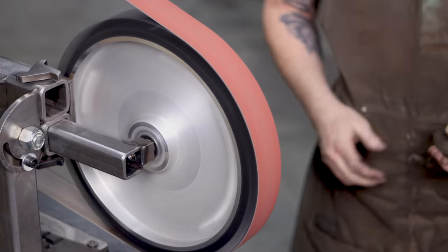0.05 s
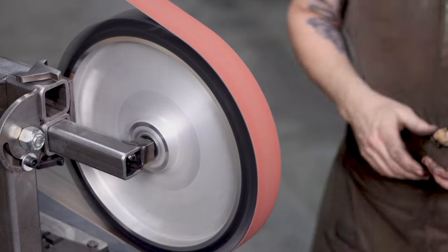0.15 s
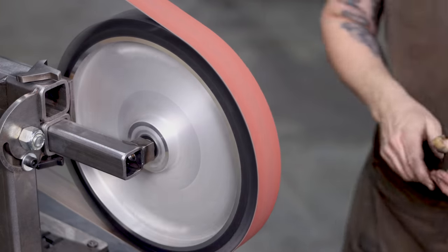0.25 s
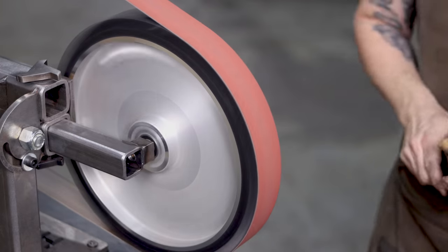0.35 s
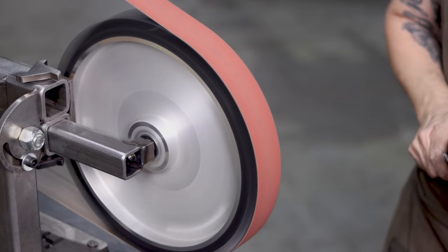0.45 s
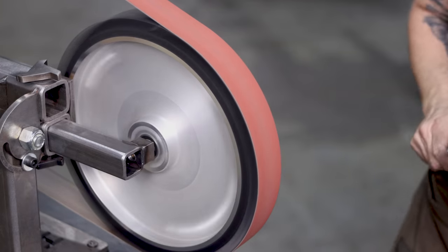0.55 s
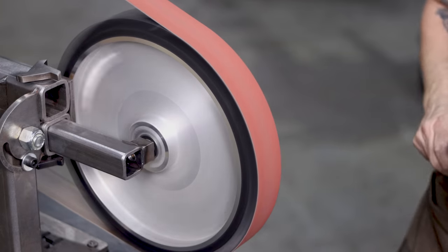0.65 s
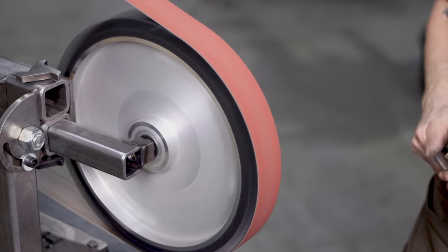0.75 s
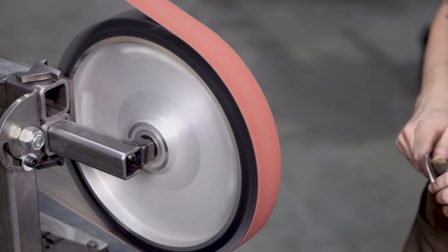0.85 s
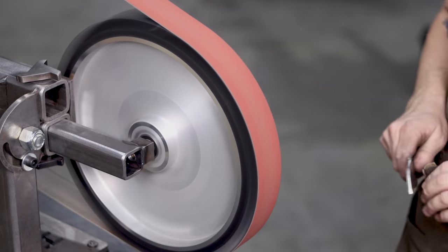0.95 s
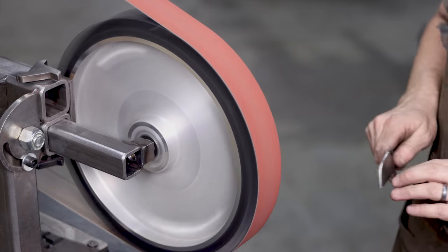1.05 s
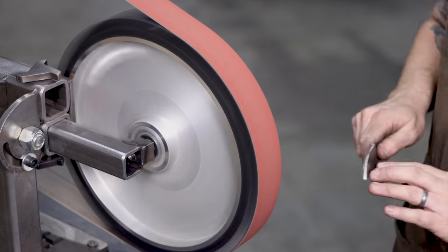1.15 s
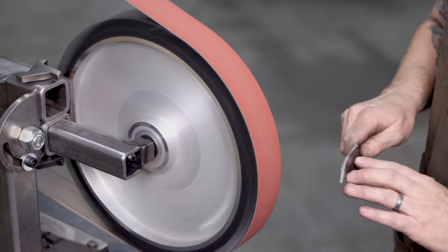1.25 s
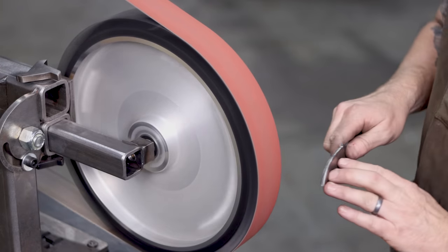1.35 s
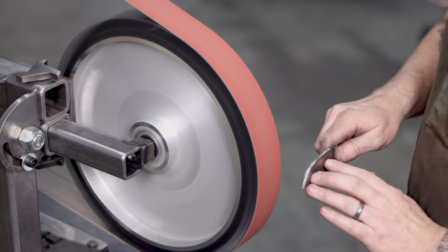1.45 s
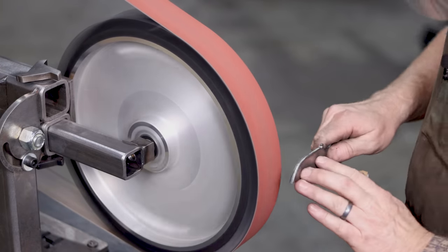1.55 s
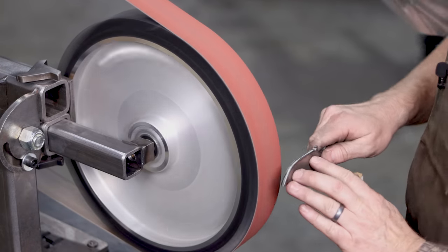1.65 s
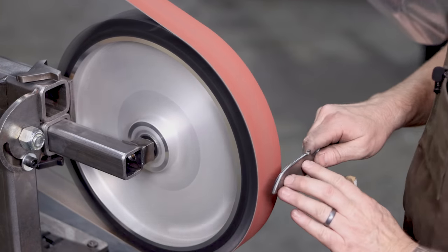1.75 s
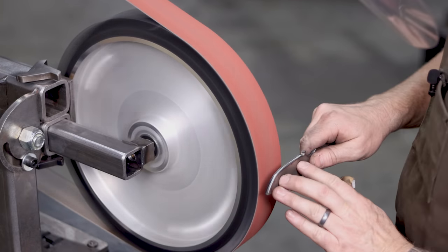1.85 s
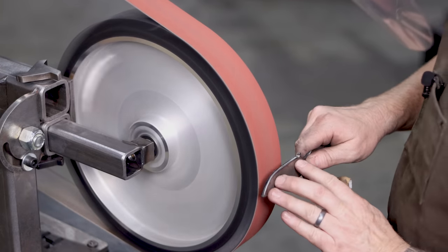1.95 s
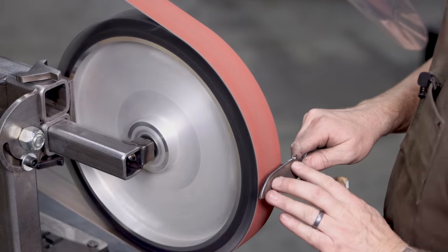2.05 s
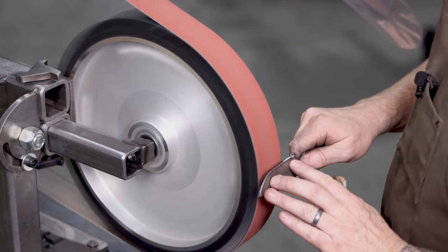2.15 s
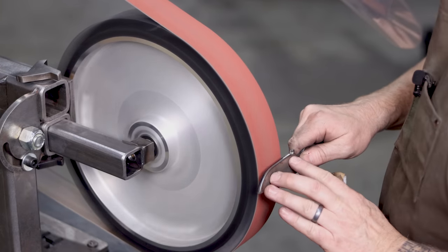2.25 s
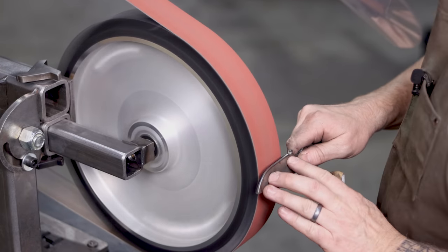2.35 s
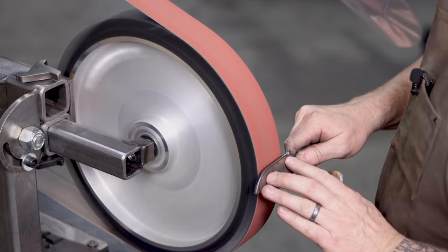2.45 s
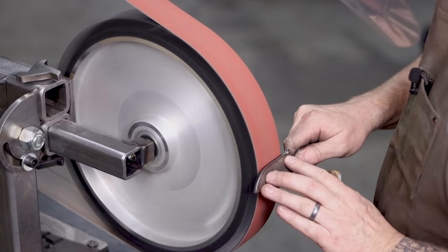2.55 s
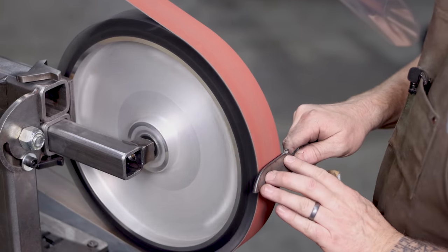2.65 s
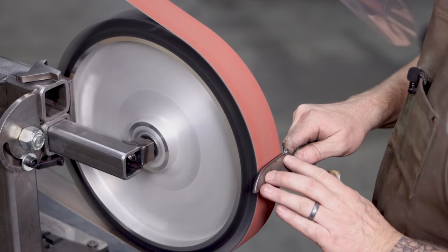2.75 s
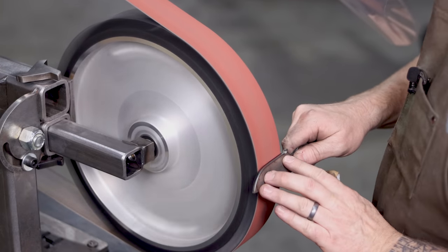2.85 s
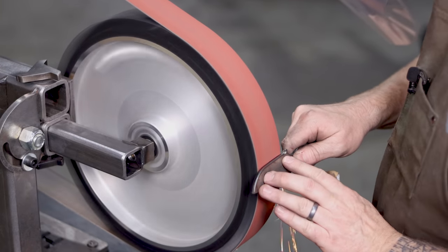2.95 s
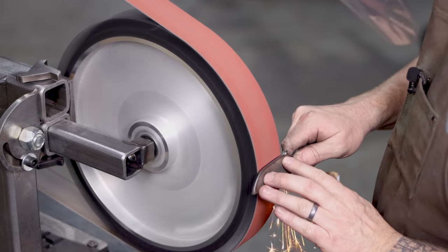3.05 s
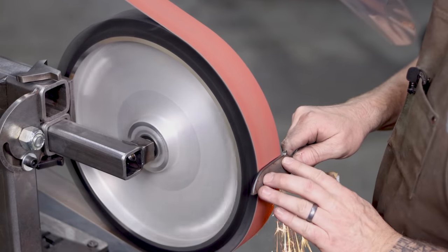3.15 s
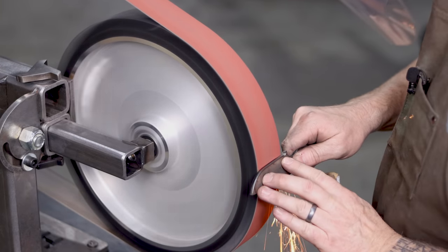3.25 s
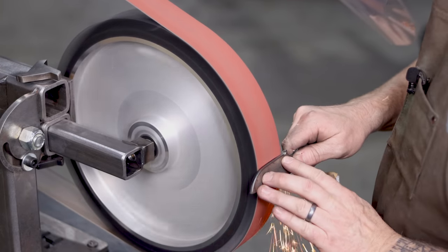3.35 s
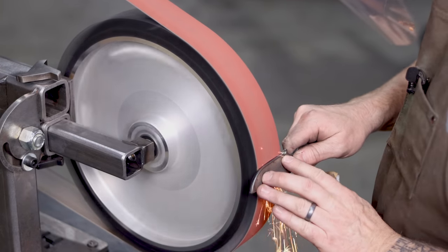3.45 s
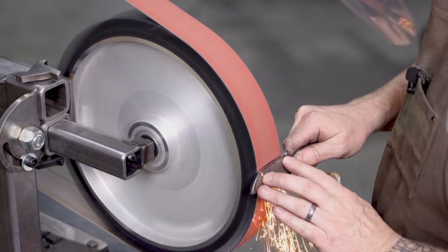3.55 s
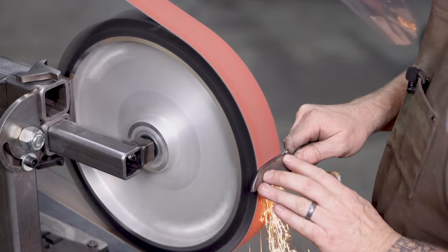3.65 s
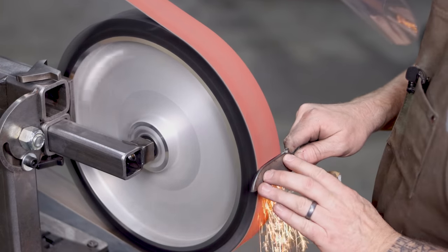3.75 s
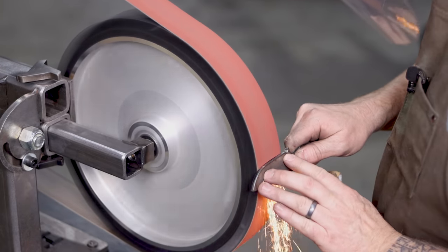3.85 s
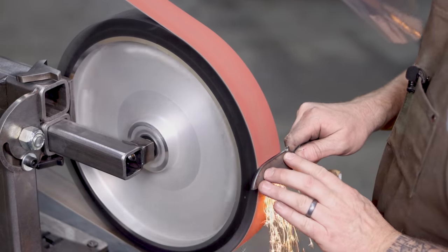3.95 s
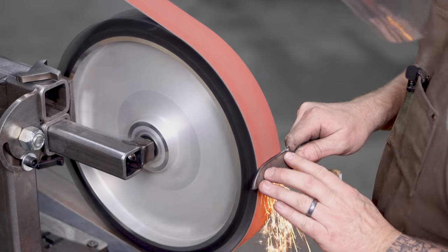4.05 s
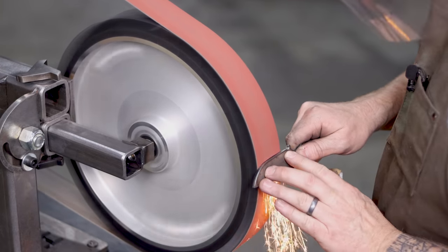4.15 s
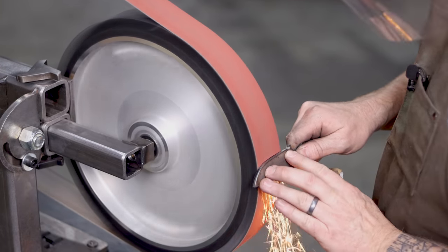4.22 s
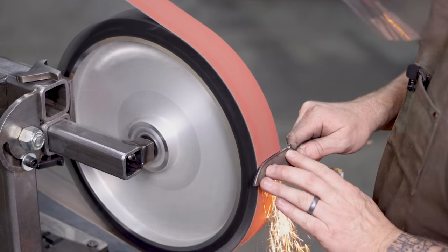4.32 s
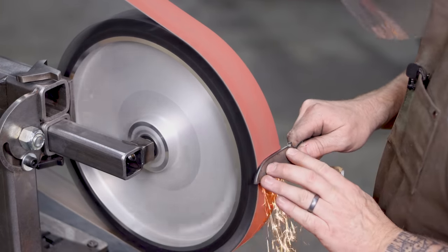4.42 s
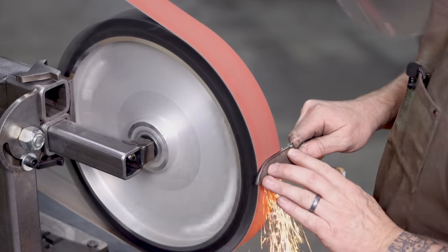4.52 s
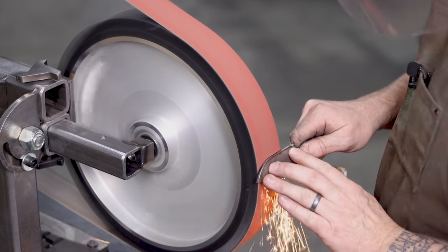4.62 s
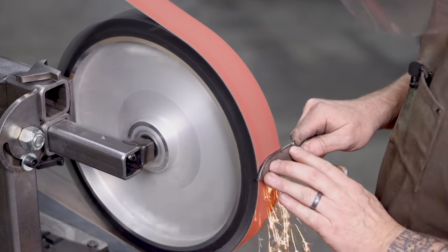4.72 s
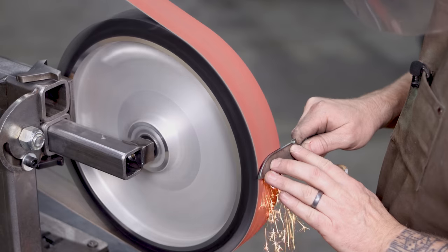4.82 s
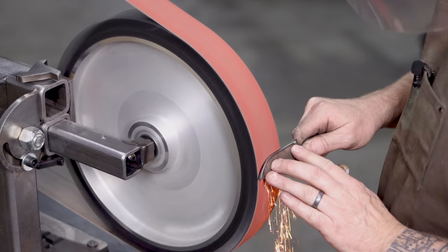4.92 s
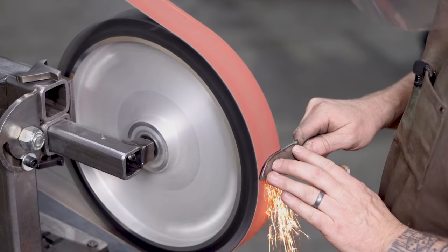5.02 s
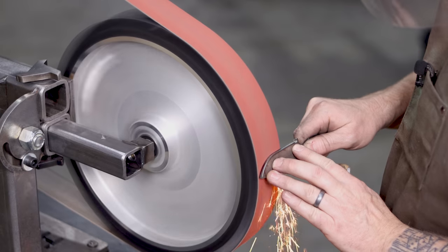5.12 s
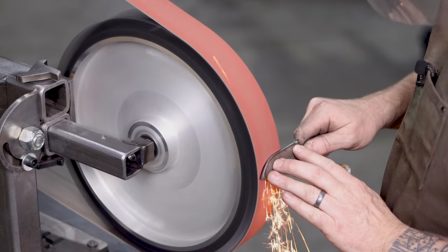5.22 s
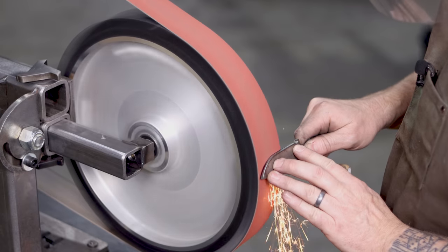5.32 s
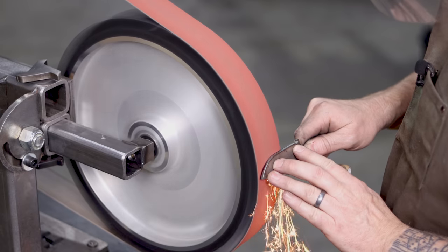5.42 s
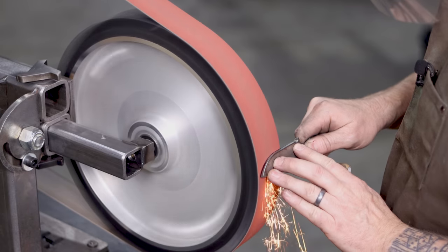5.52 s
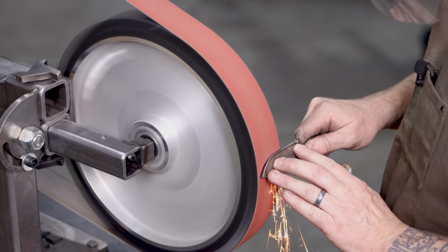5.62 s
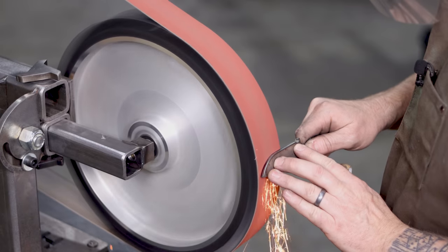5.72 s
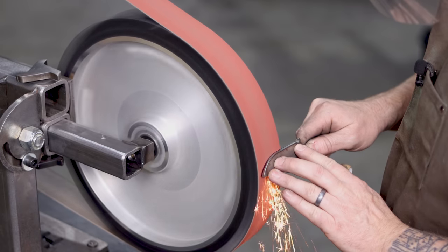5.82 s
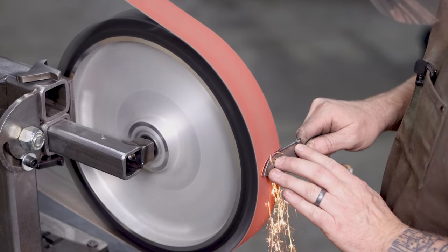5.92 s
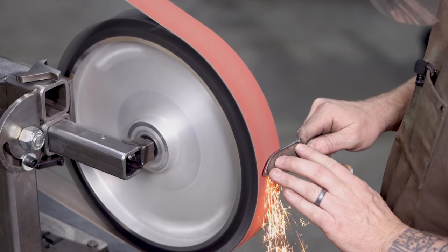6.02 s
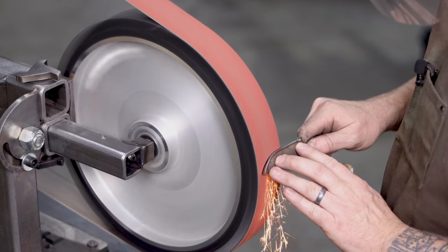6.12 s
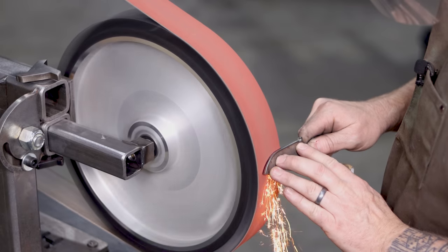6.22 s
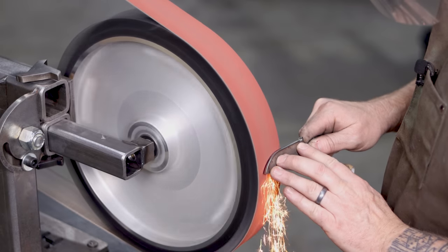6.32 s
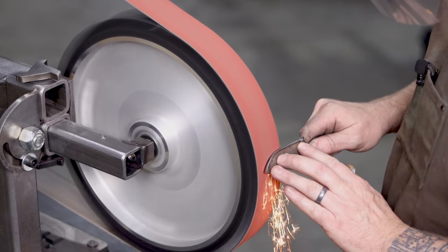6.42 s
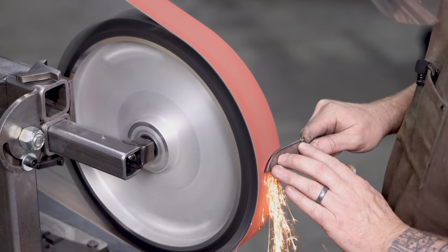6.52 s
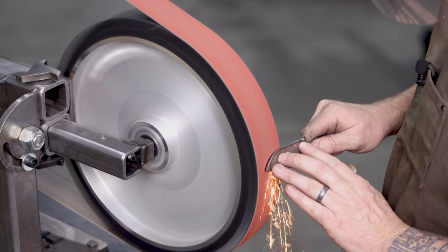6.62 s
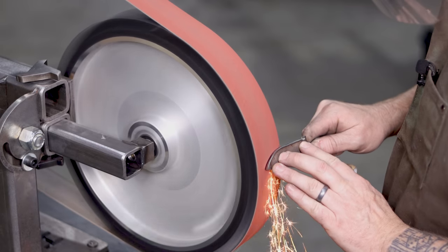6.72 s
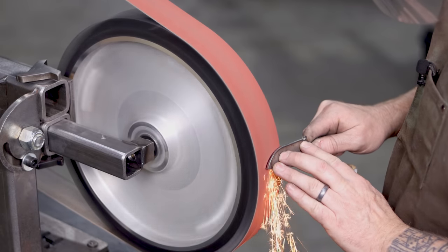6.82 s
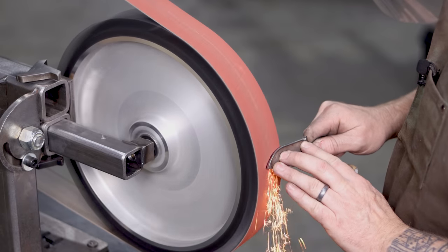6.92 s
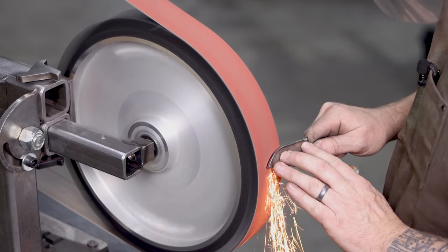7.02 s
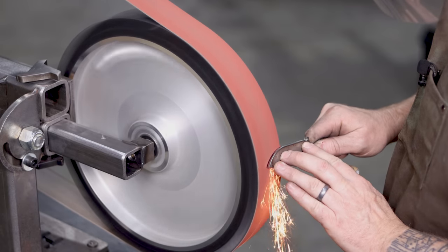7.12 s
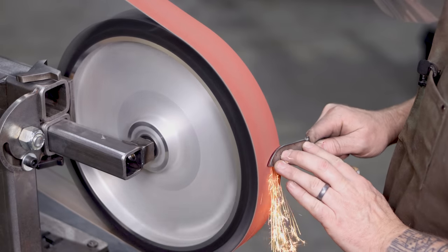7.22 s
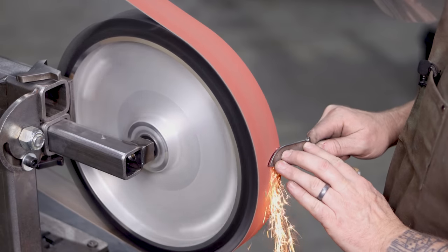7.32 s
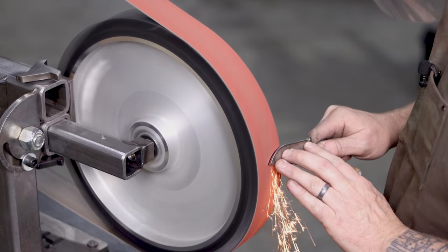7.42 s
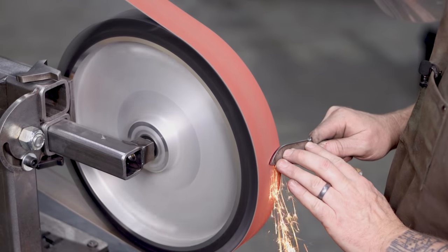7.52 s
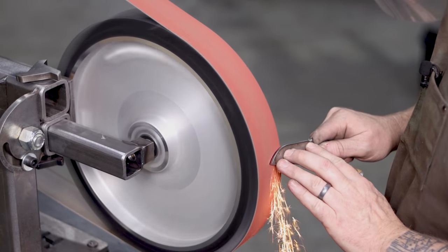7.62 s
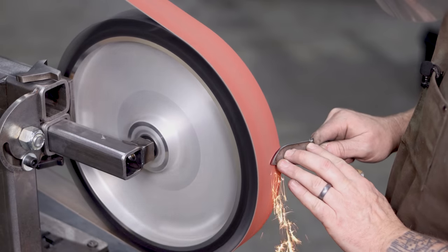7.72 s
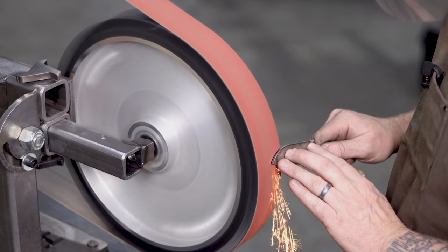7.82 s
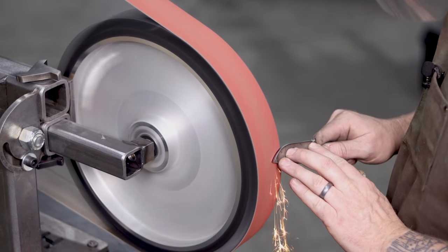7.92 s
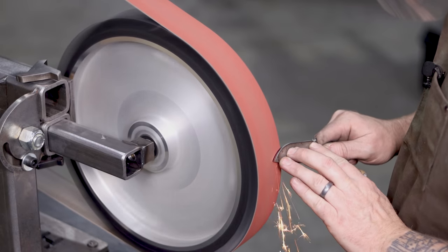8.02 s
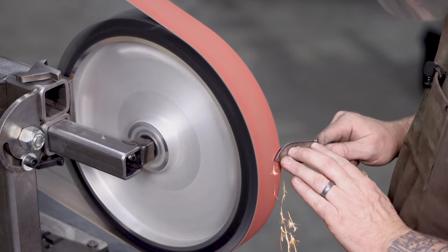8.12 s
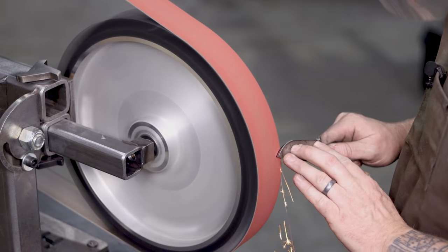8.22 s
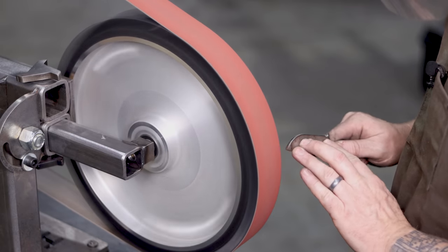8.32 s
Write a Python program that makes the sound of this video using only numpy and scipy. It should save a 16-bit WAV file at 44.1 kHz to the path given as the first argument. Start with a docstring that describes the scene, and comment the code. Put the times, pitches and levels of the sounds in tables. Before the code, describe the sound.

Steady fluttering whine and airy hiss of a running belt grinder, broken by one long bright scraping pass of steel that eases off at the end.

```python
"""Workshop: a belt grinder whines, hums and hisses while its operator steps up to the wheel.
Running tones are multiples of a tread rate; belt, frame and drone are shaped noise with a body echo.
A steel blade is then pressed on and drawn from heel to tip: grit noise rings its modes,
the load slows the belt a little, and the loud pass overloads a mono microphone input."""
import sys
import numpy as np
from scipy import signal
from scipy.io import wavfile
from scipy.ndimage import uniform_filter1d

SR = 44100
rng = np.random.default_rng(int(sys.argv[2]) if len(sys.argv) > 2 else 0)


def unload_wav(signal):
    """Save mono or channel-first audio to the path in sys.argv[1] as 16-bit WAV at rate SR, clipped to [-1, 1]."""
    wavfile.write(
        sys.argv[1],
        SR,
        np.round(np.clip(np.atleast_2d(signal).T, -1, 1) * 32767).astype(np.int16),
    )


def magnitude_from_level(level_db):
    """Linear magnitude for a level in decibels (20 dB per decade)."""
    exponent = np.asarray(level_db, float) / 20
    return 10 ** exponent


N = 369116
T = np.arange(N) / SR
SLAPS_PER_LOOP = 190


def evened(x):
    """Scales to rms 1."""
    return x / np.sqrt(np.mean(x ** 2) + 1e-20)


def curve(rows, t):
    """Columns of a table interpolated at the times t."""
    s, *columns = np.transpose(rows)
    return [np.interp(t, s, c) for c in columns]


def peak(hz, centre_hz, width_hz):
    """Power of one resonance: 1 at its centre, nothing at zero."""
    return 1 / (1 + ((hz - centre_hz ** 2 / (hz + 1)) / width_hz) ** 2)


def spread(points, hz):
    """Power of a spectrum table over the bins, mean 1."""
    f, db = np.transpose(points)
    power = magnitude_from_level(2 * np.interp(np.log(hz + 1), np.log(f), db))
    return power[:, None] / power.mean()


def patches(shape, bins, frames):
    """Smooth random field over frequency and time, rms 1."""
    field = uniform_filter1d(rng.standard_normal(shape), max(int(bins), 1), 0)
    return evened(uniform_filter1d(field, max(int(frames), 1), 1))


def recurring(turns, keep):
    """Noise that returns with a turning part; each turn adds fresh noise to the share kept."""
    size = int(N / (turns[-1] - turns[0]))
    fresh = rng.standard_normal((120, size))
    surface = signal.lfilter([1], [1, -np.clip(keep, 0, .98)], fresh, axis=0)[30:]  # drop the settling turns
    return evened(surface.ravel()[(turns * size).astype(int)])


def nearness(t):
    """0 with the operator away, towards 1 at the wheel, from the body echo delay."""
    far_ms, near_ms = .23, .035
    return np.clip((far_ms - curve(BODY_ECHO, t)[0]) / (far_ms - near_ms), 0, 1)


def load(t):
    """Load on the belt: about 0.4 before contact, 2 (the ceiling) once the blade is pressed firmly."""
    return np.clip((curve(PRESSURE, t)[0] + 62.5) / 8, 0, 2)


# contact wheel tread slapping the belt: (time [s], rate [slaps/s])
TREAD_RATE = [(0, 612), (.3, 613.4), (1.5, 613.3), (3.1, 612.5), (4.3, 609.9), (5.2, 610.4), (5.9, 609.9),
              (7, 610.1), (8.37, 611.1)]


def belt_loops():
    """Belt loops completed: the integral of the tread rate."""
    return np.cumsum(curve(TREAD_RATE, T)[0]) / SR / SLAPS_PER_LOOP


# parts out of round (wheels 5 and 6 turns a loop, pulley 3, motor 9), side tones of every multiple:
# (turns [per loop], lower tone [share of depth], phase [rad], upper tone [share of depth], phase [rad])
RUNOUT = [(3, 0.18, -1.05, .02, 8), (5, 0.24, .3, 0.13, -0.4), (6, .1, .05, 0.26, 2), (9, .03, .6, .14, -1)]


def wheel_throb(turn):
    """Out-of-round parts modulate the tread tones, as a complex sum of side tones."""
    throb = 0
    for n, low, low_rad, high, high_rad in RUNOUT:
        throb = throb + low * np.exp(1j * (low_rad - n * turn))
        throb = throb + high * np.exp(1j * (high_rad + n * turn))
    return throb


# two lowest multiples: (time [s], first level [dB], second level [dB])
LOW_TONES = [(0, -61, -66), (.3, -67, -65), (.95, -63.5, -67), (1.3, -61.5, -58.5), (1.9, -58.5, -54.5),
             (3.4, -60, -55), (3.8, -59, -58.5), (4.4, -67, -56.5), (5, -61.5, -57.5), (6.2, -58, -58),
             (7.1, -58.5, -64), (7.5, -59, -61.5), (7.8, -62, -52.5), (8.1, -62, -52), (8.37, -60, -58)]
# their throb: (depth [ratio], lag [rad])
LOW_THROB = [(0.39, 2.2), (0.15, 1.6)]
# upper multiples of the tread rate: (multiple [-], level far [dB], level near [dB],
# change per unit load [dB], throb depth [ratio], throb lag [rad])
MULTIPLES = [(3, -67, -66.5, -0.5, 0.33, 0.8), (4, -57, -44.5, -.6, 0.94, 0.06),
             (5, -70, -65.5, 3.3, 2.04, -0.35), (6, -72, -64.5, 0.5, .1, .1)]
# finer side tones: (multiple [-], offset, rounded when played [cycles per loop], share [ratio])
BEARING = [(4, -24, 0.16), (4, 20, .14), (4, 25, 0.17), (4, 29, .1), (5, -29, .29), (5, 18, 0.64),
           (1, -8.5, .12), (2, 13, 0.22)]


def whine(loops):
    """Multiples of the tread rate, throbbing with the wheels and wavering a little."""
    t, turn = T[::16], 2 * np.pi * loops[::16]
    near, loaded = nearness(t), load(t)
    levels = [(k + 1, db, *LOW_THROB[k]) for k, db in enumerate(curve(LOW_TONES, t))]
    for k, far_db, near_db, load_db, depth, lag in MULTIPLES:
        levels.append((k, far_db + (near_db - far_db) * near + load_db * loaded, depth, lag))
    wheels = wheel_throb(turn)
    starts_rad = 2 * np.pi * rng.random(len(BEARING))
    tread_rad = 2 * np.pi * SLAPS_PER_LOOP * loops + 0.078 * patches((1, N), 1, 499)[0]
    out = np.zeros(N)
    for k, db, depth, lag in levels:
        fine = sum(share * np.exp(1j * (round(n) * turn + start))
                   for (m, n, share), start in zip(BEARING, starts_rad) if m == k)
        waver_db = patches((1, len(t)), 1, 800)[0]
        envelope = magnitude_from_level(db + waver_db) * (1 + depth * np.exp(-1j * lag) * wheels + fine)
        out += np.sqrt(2) * (np.interp(T, t, envelope) * np.exp(1j * k * tread_rad)).real
    return out


# motor hum: (frequency [Hz], rms level [dB])
HUM = [(64.6, -78.5), (96.8, -79), (174, -81), (206, -80.5), (317.6, -79), (393, -82), (473, -76.5)]


def motor():
    """Faint hum: sines with slowly wandering phase."""
    out = np.zeros(N)
    for hz, db in HUM:
        phase_rad = 2 * np.pi * hz * T + 0.54 * patches((1, N), 1, 4000)[0]
        out += magnitude_from_level(db) * np.sqrt(2) * np.cos(phase_rad)
    return out


def rattle(loops):
    """Belt surface and pulley noise repeat every turn, over fresh air noise."""
    noise = .55 * recurring(loops, .85) + .6 * recurring(3 * loops, .93) + .55 * rng.standard_normal(N)
    turn = 2 * np.pi * loops
    return evened(noise * (1 + 0.043 * np.cos(6 * turn + 1.2) + 0.038 * np.cos(9 * turn + 1.2)))


# belt hiss spectrum: (frequency [Hz], relative density [dB per Hz])
BELT = [(1500, -19), (2500, -13), (3900, -6.5), (5000, -3.5), (6400, -3), (7100, 0), (8500, -4.5),
        (10000, -12.5), (12000, -14), (15800, -22.5)]
# belt hiss: (time [s], level [dB], tilt above 9 kHz [dB per octave])
HISS = [(0, -49.5, 8), (.6, -48.5, 3), (1, -46.5, 1), (1.3, -46, 2), (1.55, -45, 3), (1.8, -47.5, 5),
        (2.2, -47.5, 6), (2.6, -46.5, 6), (3, -47, 7), (3.5, -44, .1)]
# operator beside belt, bearings and frame: (time [s], echo delay off the body [ms])
BODY_ECHO = [(0, 0.24), (.3, 0.24), (.75, 0.12), (1, .12), (1.55, 0.093), (2.2, 0.045), (8.37, 0.062)]


def belt_hiss(hz, t):
    """Hiss power; the body echo combs it, and the comb sweeps up as the delay shortens."""
    echo_ms, (hiss_db, tilt_db) = curve(BODY_ECHO, t)[0], curve(HISS, t)
    echo_db = 1.14 * np.cos(2 * np.pi * np.outer(hz, echo_ms) / 1000)
    octaves = np.log2(np.maximum(hz, 9000) / 9000)[:, None]
    return spread(BELT, hz) * magnitude_from_level(2 * (hiss_db + tilt_db * octaves + echo_db))


# frame resonances: (frequency [Hz], width [Hz], relative level [dB])
FRAME = [(2410, 200, -5), (2524, 110, -4), (2630, 440, -3), (3040, 310, -11.5), (3330, 170, -11)]
# whole frame ring: (level far [dB], level near [dB])
RING_DB = (-62.5, -52)


def frame_ring(hz, t, loops):
    """Ring power of the frame; rises with load and throbs with the contact wheel."""
    ring_db = np.interp(nearness(t), (0, 1), RING_DB) + 1.5 * load(t)
    ring_db += 2.5 * np.cos(2 * np.pi * 5 * np.interp(t, T, loops) + .1)
    modes = sum(magnitude_from_level(2 * db) * peak(hz, c, w) ** 2 for c, w, db in FRAME)[:, None]
    return modes / modes.mean() * magnitude_from_level(2 * ring_db)


# drone spectrum: (frequency [Hz], relative density [dB per Hz])
DRONE = [(40, -20), (75, 1.5), (140, -12), (330, 2.5), (550, 0.7), (720, -4.5), (1150, 4), (1600, -2),
         (2200, 0), (3500, -9), (15800, -40)]


def drone(hz):
    """Steady noise power of the motor in the shop."""
    return spread(DRONE, hz) * magnitude_from_level(2 * -59)


def running(loops):
    """Rattle noise filtered to the summed power of hiss, frame and drone, with random patches."""
    hz, t, z = signal.stft(rattle(loops), SR, nperseg=2048, noverlap=1536)
    power = belt_hiss(hz, t) + frame_ring(hz, t, loops) + drone(hz)
    z *= np.sqrt(power) * magnitude_from_level(1.5 * patches(z.shape, 20, 30))
    return signal.istft(z, SR, nperseg=2048, noverlap=1536)[1][:N]


# draught on the microphone: (time [s], level [dB])
RUMBLE = [(0, -87), (1, -87), (1.55, -75), (2.6, -64), (3.5, -60.5), (5, -64), (7.3, -70), (8.37, -67.5)]


def draught():
    """Air thrown off the wheel buffets the microphone: low-passed noise."""
    low = signal.sosfilt(signal.butter(2, 110, fs=SR, output="sos"), rng.standard_normal(N))
    return evened(low) * magnitude_from_level(curve(RUMBLE, T)[0] + 1.5 * patches((1, N), 1, 3000)[0])


def grit_strikes(loops, press_db):
    """Spiky noise of grains striking steel, part of it returning each belt loop."""
    grit = rng.standard_normal(N) * magnitude_from_level(2.48 * np.minimum(rng.exponential(1, N), 3.5))
    grit = evened(grit) + 0.32 * recurring(loops, 0.803)
    lightness = np.clip((-26.0 - press_db) / 8, 0, 1)  # a lightly held blade skips on the grit
    chatter_db = (0.55 + 1.83 * lightness) * patches((1, N), 1, 110)[0]
    chatter_db += 0.35 * patches((1, N), 1, 1500)[0]
    return evened(grit * magnitude_from_level(chatter_db))


# blade modes: (frequency [Hz], width [Hz], relative level ground at five places, heel to tip [dB] x 5)
BLADE = [ (2235, 720, -4, -16, -6, -11, -13), (2405, 600, -5, -5, -1, -10, 3),
         (2410, 70, -11, -11, 2, 3, -6), (2810, 500, -16, -13.5, -11.5, -10, -8.5),
         (3110, 520, -13, -7.5, -5.5, -6.5, -8), (3466, 500, -16, -9, -6.5, -8, -21),
         (4090, 820, -19, -6.5, -12.5, -11.5, -28), (4780, 680, -6, -3.5, -0.5, -9, 2.5),
         (5185, 980, -6, -5, -6.5, -11.5, -4), (5690, 1500, -3.5, -4, -35, -15, -9),
         (6420, 770, -12, -1, -5, -10, -11), (7020, 730, 0, -1, 4, 0.1, -10),
         (7810, 580, 1, -1, -8, -4.5, -16), (8570, 1400, -3, -10, 0, -9, -15),
         (9320, 1250, -12, -11.5, -9.5, -14.5, -9), (10100, 980, -7, -15, -18, -7, -10),
         (10850, 550, -16, -17, -12, -19, -15), (11670, 780, -12, -18, -14, -18.5, -8),
         (12360, 500, -17, -12.5, -14, -15, -10), (12600, 770, -7, -17, -7, -12, -11),
         (13660, 500, -10, -9, -14, -15, -19), (13700, 840, -15, -29, -16, -14, -22),
         (14600, 740, -12, -16, -6, -10, -11), (15100, 780, -17, -17, -21, -14, -12),
         (15870, 840, -5, -14, -9, -14, -17), ]
# stroke: (time [s], place of contact, 0 heel to 4 tip [-])
STROKE = [(3.1, 0.01), (3.7, 0.77), (4.8, 1.26), (5.5, 2.27), (6.4, 2.6), (7.3, 2.97), (8, 3.38)]


def blade_modes(hz, t):
    """Mode power; the place of contact sets which modes answer."""
    place = curve(STROKE, t)[0]
    power = sum(peak(hz, c, w)[:, None] ** 2 * magnitude_from_level(2 * np.interp(place, range(5), db))
                for c, w, *db in BLADE)
    power *= peak(hz, 6500, 16200)[:, None]  # a small blade radiates no bass
    return power / power.mean(0)


def wheel_knocks_db(hz, t, loops):
    """Wheel high spots knock the blade each turn, the low modes harder and later."""
    turn, low = 2 * np.pi * np.interp(t, T, loops), peak(hz, 2830, 1300)[:, None]
    knock_db = (0.95 + 0.78 * low) * np.cos(5 * turn + 1.9 - 1.0 * low)
    return knock_db + 1.3 * low * np.cos(10 * turn - 2.1) + .5 * np.cos(6 * turn + 0.57)


# hand pressure on the blade, as grinding level: (time [s], level [dB])
PRESSURE = [(3.02, -59), (3.035, -36), (3.1, -38), (3.3, -33), (3.5, -29), (3.6, -26), (4.1, -25),
            (4.55, -26.5), (4.72, -25), (5, -27), (5.3, -30.5), (6.15, -29), (6.7, -30.5), (7.5, -30),
            (8.1, -34), (8.25, -33), (8.3, -36.5), (8.335, -42), (8.36, -52)]


def grinding(loops):
    """Grit strikes ring the blade modes, knocked by the wheels, at the level of the hand pressure."""
    press_db = curve(PRESSURE, T)[0]
    hz, t, z = signal.stft(grit_strikes(loops, press_db), SR, nperseg=512, noverlap=384)
    level_db = wheel_knocks_db(hz, t, loops) + 0.85 * patches(z.shape, 6, 11)
    z *= np.sqrt(blade_modes(hz, t)) * magnitude_from_level(level_db)
    touching = T > PRESSURE[0][0]
    return signal.istft(z, SR, nperseg=512, noverlap=384)[1][:N] * magnitude_from_level(press_db) * touching


def scene():
    """One microphone feeds both channels."""
    loops = belt_loops()
    mono = whine(loops) + motor() + running(loops) + draught() + grinding(loops)
    return np.tile(mono, (2, 1))


def overload(x):
    """Input stage flattens peaks near its ceiling."""
    top = magnitude_from_level(-27)
    return x / (1 + abs(x / top) ** 6.5) ** (1 / 6.1)


def low_pass(x):
    """Removes everything above the highest recorded frequency."""
    return signal.sosfilt(signal.butter(12, 16990, fs=SR, output="sos"), x)


def record(dry):
    """Overloaded input stage, then a steep band limit."""
    edge_hz = 15750
    lowpass = signal.firwin(2047, edge_hz, window=("kaiser", 9), fs=SR)[None]
    limited = signal.oaconvolve(overload(dry), lowpass, "same")
    return low_pass(limited)


dry = scene()
out = record(dry)
unload_wav(out)
```